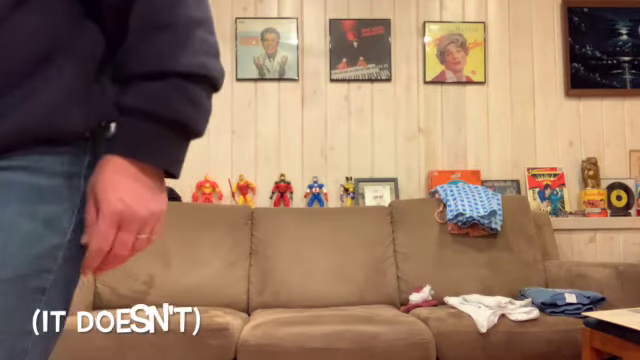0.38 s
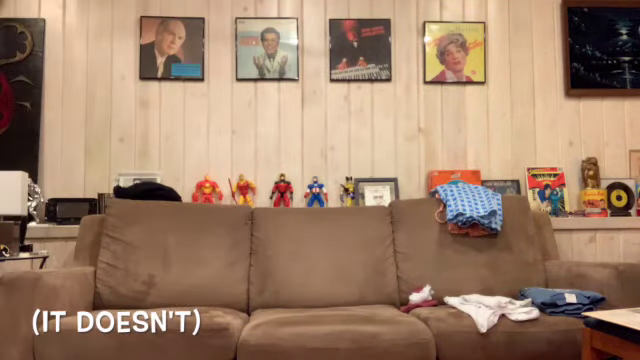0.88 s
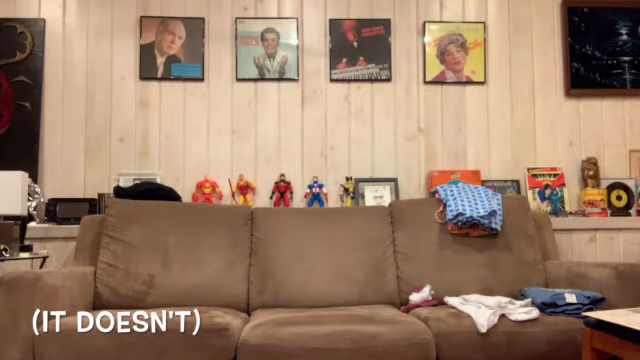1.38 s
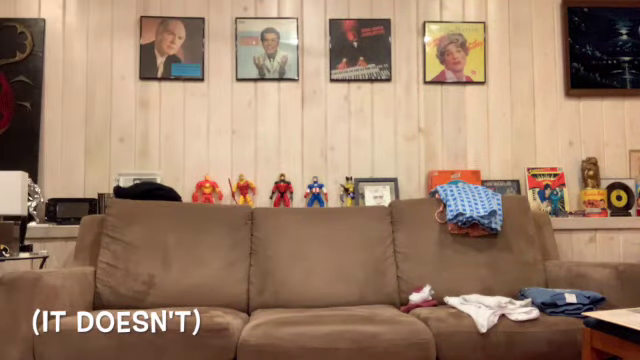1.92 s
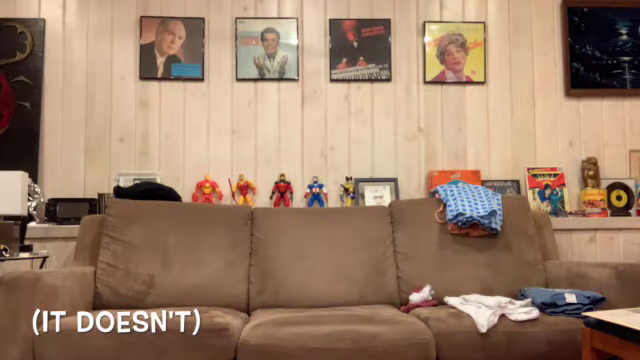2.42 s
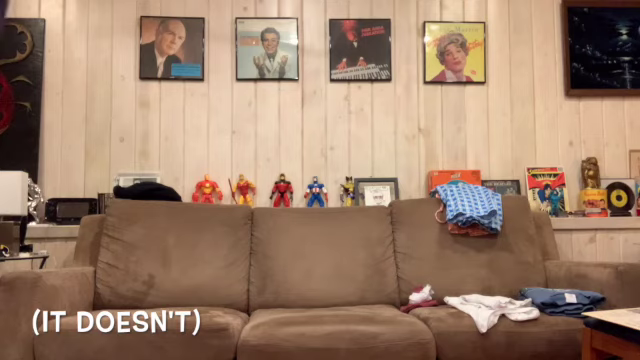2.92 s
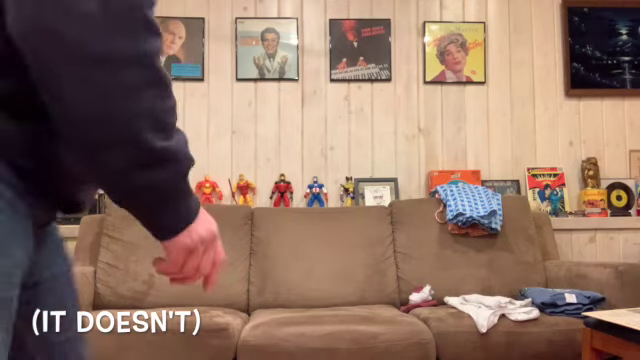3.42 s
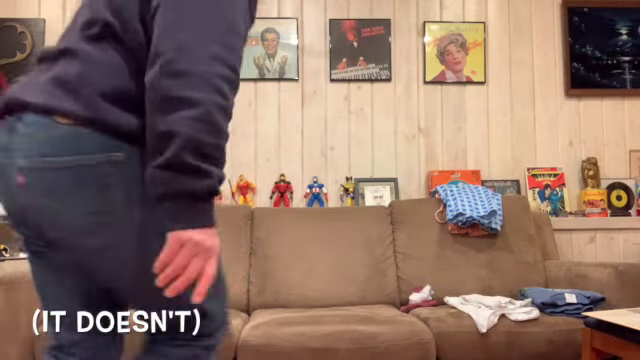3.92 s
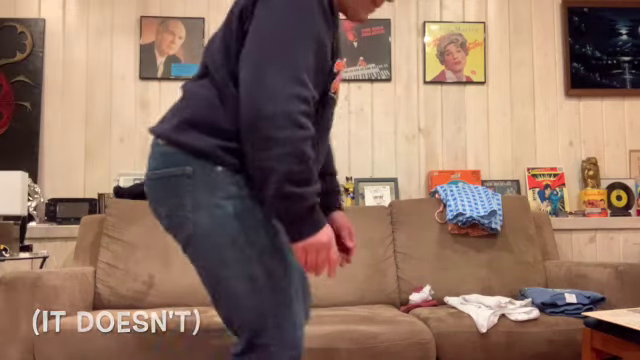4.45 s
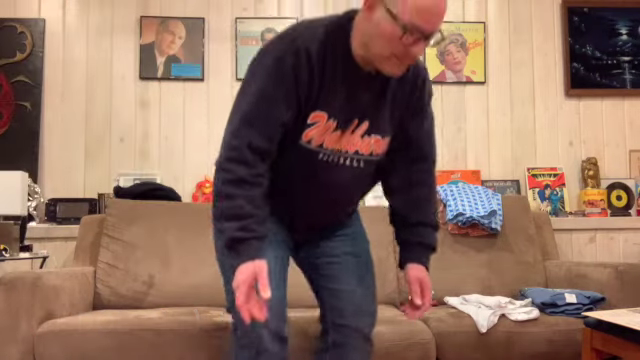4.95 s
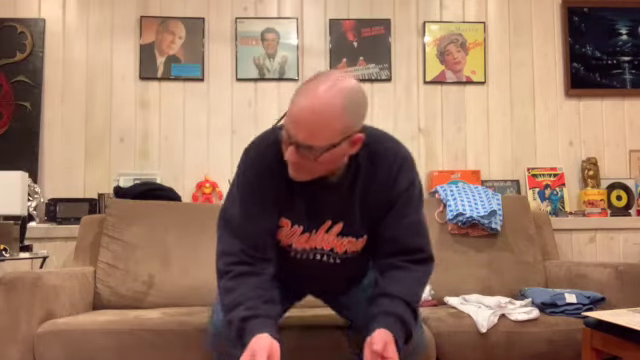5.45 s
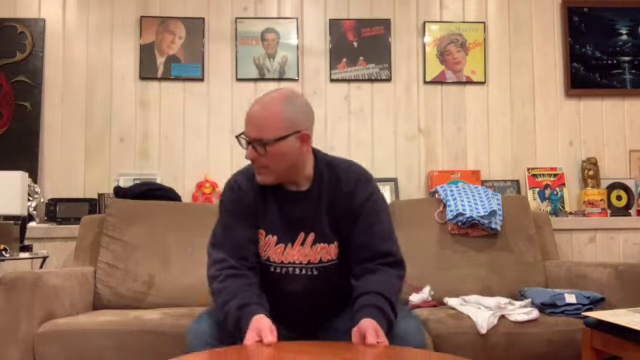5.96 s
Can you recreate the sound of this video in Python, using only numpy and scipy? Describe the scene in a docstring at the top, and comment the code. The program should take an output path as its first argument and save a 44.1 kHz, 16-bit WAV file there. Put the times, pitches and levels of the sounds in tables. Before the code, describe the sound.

A small panelled room with a short reverberation, heard by a stereo phone over soft hiss and very faint mains hum. At 0.1 s a close cloth swish passes with a light scrape and scuff; low dull footfalls and more rustling follow around 0.7-0.8 s, then it quiets. At 1.6 s a distant cabinet latch shuts with a hard, rattly, bright clack, clearly the loudest event, followed by a weaker rebound at 1.75 s and a lingering low boom. Faint thuds follow near 2 s. From 2.6 s footsteps return on the hollow floor with swishes and scuffs, strong at 3.4 s and strongest around 3.95-4.1 s, with tiny clicks at 3.8 s. Softer thuds and rustles occur near 4.9-5 s, with small ticks at 5.25-5.3 s. From about 5.6 s until the end at 6 s, a low table drags over carpet, juddering, groaning and hissing as it grows louder.

```python
"""In a small panelled room a person walks out, shuts a cabinet latch with a clack and a rebound, and walks back.
Soles thud on a hollow floor (ringing modes), clothes swish (grainy noise) and small things tick (short clicks).
At the end a low table is pulled across the carpet: stick-slip noise through the modes of its top and legs.
A phone with two microphone ports hears it over room hiss (shaped noise) and a faint mains hum (a sine)."""
import sys
import numpy as np
from scipy import signal
from scipy.fft import rfft, irfft, next_fast_len
from scipy.io import wavfile
from scipy.ndimage import uniform_filter1d

SR = 44100
rng = np.random.default_rng(int(sys.argv[2]) if len(sys.argv) > 2 else 0)


def linear_from_db(decibels):
    """Turn decibels (scalar or array-like) into linear amplitude factors; 0 gives 1."""
    return 10 ** (np.asarray(decibels, float) / 20)


def generate_wav(sig):
    """Save sig (samples, or channels by samples) to the path in sys.argv[1] as 16-bit PCM at SR."""
    pcm = np.round(np.clip(np.atleast_2d(sig).T, -1, 1) * 32767).astype(np.int16)
    wavfile.write(sys.argv[1], SR, pcm)


N = 268392  # length in samples


def read(points, hz):
    """Log-frequency interpolation: reads a table on a logarithmic frequency axis."""
    f, value = np.transpose(points)
    return np.interp(np.log(hz + 1), np.log(f + 1), value)


# shared treble roll-off: pitch_hz [Hz], level_db [dB]
TREBLE_ROLL_OFF = [(6000, -0.5), (10000, -2.5), (12500, -10), (14300, -10.5), (14950, -52)]


def spectrum_gain(points, hz):
    """Spectral envelope: a source's own spectrum up to 6 kHz, held above it while the shared roll-off acts."""
    return linear_from_db(read(points, np.minimum(hz, 6000)) + read(TREBLE_ROLL_OFF, hz))


def evened(x):
    """Normalisation: scales to rms 1."""
    return x / np.sqrt(np.mean(x ** 2) + 1e-20)


def smooth_noise(size, count=N):
    """Low-pass noise: a running mean over size samples gives a slow random drift of rms 1."""
    return evened(uniform_filter1d(rng.standard_normal(count), size=size))


def add(mix, start_s, sound):
    """Superposition: adds a sound into the mix from its start time."""
    part = mix[..., round(start_s * SR):][..., :sound.shape[-1]]
    part += sound[..., :part.shape[-1]]


def coloured(x, gain):
    """Linear filtering: multiplies the spectrum by a gain function of frequency."""
    size = next_fast_len(x.shape[-1])
    spectrum = rfft(x, size) * gain(np.fft.rfftfreq(size, 1 / SR))
    return irfft(spectrum, size)[..., :x.shape[-1]]


def modes(x, table):
    """Modal synthesis: a sum of damped resonators with alternating signs, each scaled at its own peak."""
    out = 0
    for k, (hz, width_hz, db) in enumerate(table):
        pole = np.exp((-np.pi * width_hz + 2j * np.pi * hz) / SR)
        ringing = 2 * signal.lfilter([1 - abs(pole)], [1, -pole], x).real
        out = out + (-1) ** k * linear_from_db(db) * ringing
    return out


def lean(db):
    """Level panning: left and right gains that differ by db."""
    return linear_from_db(np.multiply.outer([.5, -.5], db))


def slowly(control):
    """Control-rate envelope: worked out every 64 samples and joined by straight lines."""
    t = np.arange(0, N + 64, 64) / SR
    return np.interp(np.arange(N) / SR, t, control(t))


def field(magnitude, size, patchy_db):
    """Random-phase synthesis: two noise fields from random short-time spectra with drifting patches."""
    hop = size // 4
    t, hz = np.arange(N // hop + 5) * hop / SR, np.fft.rfftfreq(size, 1 / SR)
    a, b, c, d, patches = rng.standard_normal((len(t), len(hz), 5)).T
    patches = uniform_filter1d(patches, size // 64, 0)  # smooth along frequency
    patches = evened(uniform_filter1d(patches, 4096 // size, 1))  # smooth along time
    spectra = np.array([a + 1j * b, c + 1j * d]) * magnitude(hz[:, None], t) * linear_from_db(patchy_db * patches)
    return signal.istft(spectra, nperseg=size, noverlap=size - hop)[1][:, :N]


# left-right likeness of diffuse sound: pitch_hz [Hz], likeness [-1 to 1]
PORT_LIKENESS = [(60, 0.37), (150, 0.67), (300, 0.63), (700, 0.14), (2000, 0.085), (6000, -0.056),
                 (7600, -0.98), (8600, 0.14), (10200, -0.23), (11200, 0.99)]


def ports(fields):
    """Interaural-style coherence: two unrelated fields become what the ports share and what sets them apart."""
    def share_gains(hz):
        likeness = np.clip(read(PORT_LIKENESS, hz), -1, 1)
        return np.sqrt([(1 + likeness) / 2, (1 - likeness) / 2])

    def early(hz):  # lows and mids reach the left port 0.23 ms first
        return np.exp(2j * np.pi * hz * .00023 / (1 + (hz / 4500) ** 6))

    shared, apart = coloured(fields, share_gains)
    return np.array([coloured(shared + apart, early), shared - apart])


# reverberation of the room: pitch_hz [Hz], t60_s [s]
ROOM_DECAY = [(100, 0.071), (260, 0.43), (700, 0.27), (4850, 0.24)]


def room(x, start_s=.004, count=1):
    """Frequency-dependent reverberation: sparse taps of random sign, each band dying at its own speed.
    A sound spread over count places gets a pair of tails for each."""
    taps = np.zeros((count, 2, SR // 2))
    at = np.arange(round(start_s * SR), SR // 2 - 20, 20)
    at = at + rng.integers(0, 20, (count, 2, len(at)))
    np.put_along_axis(taps, at, rng.choice([-1., 1.], at.shape), 2)
    hz, t, spectra = signal.stft(taps, SR, nperseg=256)
    decay = linear_from_db(-60 * t / read(ROOM_DECAY, hz)[:, None])
    tails = signal.istft(spectra * decay, SR, nperseg=256)[1]
    tails = tails / np.linalg.norm(tails[0, 0])
    # the places take turns, 256 samples each
    place = np.arange(N) // 256 % count == np.arange(count)[:, None]
    answers = signal.fftconvolve((x * place)[:, None], tails, axes=2)
    return ports(answers.sum(0)[:, :N])


# spectrum of the hiss before it is evened: pitch_hz [Hz], level_db [dB per Hz, relative]
HISS_SPECTRUM = [(25, -8.5), (55, 11.5), (86, -9), (120, 1), (170, -15), (306, -4.5), (600, -29.5),
                 (1100, -21), (2000, -22), (6000, -23)]
# mains hum before its waver: pitch_hz [Hz], level_db [dB rms]
MAINS_HUM = [(60, -70)]


def hiss():
    """Stationary noise and a tone: room air and microphone hiss, with a wavering mains hum."""
    t = np.arange(N) / SR
    noise = field(lambda hz, t: spectrum_gain(HISS_SPECTRUM, hz), size=2048, patchy_db=2.0)
    air = linear_from_db(-62) * evened(ports(noise))
    waver = evened(uniform_filter1d(rng.standard_normal((N, len(MAINS_HUM))), size=3000, axis=0))
    hum = 0
    for k, (hz, db) in enumerate(MAINS_HUM):
        tone = np.sqrt(2) * np.sin(2 * np.pi * (hz * t + rng.random()))
        hum = hum + linear_from_db(db + 1.4 * waver[:, k]) * tone
    return air + hum


def strokes(rows, fade_db_per_s, t):
    """Exponential envelope: the power of each stroke climbs 20 dB in its rise time, holds, then fades."""
    full_s, db, rise_s, hold_s = np.transpose(rows)[:4, :, None]
    below_db = 20 * np.maximum(full_s - t, 0) / rise_s
    faded_db = fade_db_per_s * np.maximum(t - full_s - hold_s, 0)
    return linear_from_db(db - below_db - faded_db) ** 2


# steady rustle of the moving body, and from 5.82 s the rubbing of the pulled table: start_s [s], level_db [dB],
# brightness [dB per octave]
BODY_RUSTLE = [(0.0, -58.5, -1), (0.5, -55.5, 0.5), (0.62, -56, 0.5), (0.79, -49.5, 0), (1.14, -61, 0),
               (1.25, -74.5, -7.5), (1.979, -63.5, -1), (2.3, -67, -2.5), (2.6, -63, -1), (2.83, -61.5, 2),
               (3.2, -65.5, 0.5), (4.42, -64.5, -2), (4.7, -62, 0), (5.2, -58.5, 0), (5.48, -59, -1),
               (5.82, -52, -2), (6.06, -49.5, -1)]
# swishes of cloth: full_s [s], level_db [dB], rise_s [s], hold_s [s], brightness [dB per octave]
CLOTH_SWISHES = [(0.065, -42.5, 0.048, 0.051, 0.5), (2.63, -50, 0.021, 0.0038, -3.5),
                 (2.852, -49, 0.05, 0.013, -1), (3.013, -45.5, 0.15, 0.012, -2.5),
                 (3.368, -55.5, 0.12, 0.15, 0), (3.548, -50, 0.14, 0.0035, -2),
                 (3.751, -53, 0.058, 0.023, 0.5), (3.942, -42, 0.24, 0.023, -1.5),
                 (4.107, -50.5, 0.12, 0.042, -0.3), (4.188, -54, 0.079, 0.12, -1.5),
                 (4.859, -47, 0.16, .004, -1.5), (5.015, -53.5, 0.024, 0.02, -1.5),
                 (5.261, -58, 0.27, 0.072, -0.5), (5.545, -54.5, 0.086, 0.018, -1)]


def rubbing(t):
    """Power addition: level and brightness of the cloth, where the loudest part sets the colour."""
    s, db, bright = np.transpose(BODY_RUSTLE)
    steady = linear_from_db(np.interp(t, s, db)) ** 2
    swishes = strokes(CLOTH_SWISHES, 184, t)  # fade in dB per s
    total = steady + swishes.sum(0)
    weighted_tilt = steady * np.interp(t, s, bright) + np.transpose(CLOTH_SWISHES)[4] @ swishes
    return np.sqrt(total), weighted_tilt / total


# spectrum of rubbing fibres before tilt and soft top: pitch_hz [Hz], level_db [dB per Hz, relative]
CLOTH_SPECTRUM = [(250, -11), (500, -6.5), (1300, -2.5), (2500, -6), (4300, -6.5), (6000, -10.5)]


def cloth():
    """Friction noise: rubbing fibres, grainy, with a tilt about 2 kHz that turns as the rubbing part changes."""
    def magnitude(hz, t):
        tilt = linear_from_db(rubbing(t)[1] * np.log2(np.clip(hz, 400, 12000) / 2000))
        soft_top = 1 / np.sqrt(1 + (hz / 7500) ** 4)
        return spectrum_gain(CLOTH_SPECTRUM, hz) * soft_top * tilt

    swish = field(magnitude, size=256, patchy_db=2.0)
    swish /= np.sqrt(uniform_filter1d((swish ** 2).mean(0), size=4000))  # tilt changes colour, not level
    grain = linear_from_db(1.44 * smooth_noise(250))  # threads catch in short bunches
    return ports(swish * grain * slowly(lambda t: rubbing(t)[0])) * lean(3.0)[:, None]


# scuffs of soles: full_s [s], level_db [dB], rise_s [s], hold_s [s]
SOLE_SCUFFS = [(0.15, -51.5, 0.042, .004), (0.79, -50.5, 0.26, 0.033), (3.01, -48.5, 0.25, 0.0028),
               (3.41, -38, 0.056, 0.0027), (3.94, -44.5, 0.19, 0.0023), (5.82, -56, 0.2, .3)]


def shuffling(t):
    """Power addition: soles shuffle 8.5 dB under the steady rustle, and single scuffs rise above it."""
    s, db, _ = np.transpose(BODY_RUSTLE)
    steady = linear_from_db(np.interp(t, s, db) - 8.5) ** 2
    return np.sqrt(steady + strokes(SOLE_SCUFFS, 230, t).sum(0))  # fade in dB per s


# modes of the hollow floor: pitch_hz [Hz], level_db [dB, relative], t60_s [s, free ringing after a footfall]
FLOOR_MODES = [(42.4, 3, 0.47), (60, 23, 0.1), (157.2, 7.5, 0.071), (176.5, 9, 0.09), (235, 5, 0.091),
               (288.3, 7, 0.12), (308, 6.5, 0.058), (446, 4, 0.12), (582, -3.5, 0.04)]


def scuff():
    """Forced vibration: rolling and dragging soles shake the floor modes with lumpy noise."""
    lumps = linear_from_db(2.5 * smooth_noise(900))
    # the two deepest modes stay out; the others are wider than in free ringing (2.2 / t60)
    boards = [(hz, 3.04 / t60, db) for hz, db, t60 in FLOOR_MODES[2:]]
    shake = evened(modes(rng.standard_normal((2, N)) * lumps, boards))
    return ports(shake * slowly(shuffling))


# scrapes of a seam, sole or latch tongue:
# start_s [s], length_s [s], pitch_hz [Hz], width_hz [Hz, each of two passes], level_db [dB before the stroke shape]
PITCHED_SCRAPES = [(0.038, 0.092, 1340, 504, -42.5), (1.529, 0.015, 4200, 900, -54),
                   (1.56, 0.13, 1290, 2460, -44.5), (1.752, 0.038, 4270, 1300, -36),
                   (3.035, 0.031, 2330, 600, -45.5), (3.773, 0.039, 4340, 2920, -43.5),
                   (3.772, 0.031, 1000, 300, -42), (4.252, 0.11, 1310, 400, -51)]


def scrapes():
    """Resonant filtering: noise passes twice through one broad resonance, starting fast and fading."""
    out = np.zeros((2, N))
    t = np.arange(4096) / SR
    for s, length, hz, width, db in PITCHED_SCRAPES:
        stroke = (t / length) ** 0.2 * np.exp(-(1.5 * t / length) ** 2)
        band = [(hz, width, 0)]
        noise = evened(modes(modes(rng.standard_normal((2, 4096)), band), band))
        add(out, s, linear_from_db(db) * stroke * noise)
    return ports(out)


# small clicks: start_s [s], level_db [dB peak before the room], pitch_hz [Hz], gap_s [s between bounces]
SMALL_TICKS = [(2.097, -54, 780, .004), (3.774, -41, 1000, .0045), (3.7752, -38, 4200, .002),
               (5.2465, -34.5, 3300, .0027), (5.2965, -43, 1150, .005)]


def ticks():
    """Impulse response: seams, buttons and joints snap, bounce between near hard faces, and the room answers."""
    near, t = np.zeros(N), np.arange(800) / SR
    for s, db, hz, gap in SMALL_TICKS:
        snap = sum(linear_from_db(-4 * k) * (abs(t - gap * k) < .5 / SR) for k in range(3))
        click = modes(snap, [(hz, 0.65 * hz, 0), (0.96 * hz, 0.83 * hz, -1.5)])
        click = modes(click, [(1.3 * hz, 0.95 * hz, 0)])
        add(near, s, linear_from_db(db) * click / abs(click).max())
    return near + linear_from_db(4.0) * room(near, start_s=0.00238)


# low thuds, mostly footfalls; the last row, at 5.983 s, is a bump as the pulled table's pitch sinks to 170 Hz:
# start_s [s], level_db [dB peak before the room], pitch_hz [Hz, centre of the thud]
LOW_THUDS = [(0.726, -37.5, 188), (0.761, -34.5, 60), (0.82, -39.5, 55.6), (1.815, -44, 342),
             (2.06, -53, 69.5), (2.605, -41, 148), (2.844, -41, 240), (2.998, -39, 355),
             (3.329, -42.5, 267), (3.395, -35, 330), (3.4037, -29, 205), (3.424, -36.5, 245),
             (3.426, -38.5, 44.4), (3.546, -41, 340), (3.876, -36.5, 327), (3.953, -25, 214),
             (4.094, -29.5, 250), (4.869, -44, 346), (5, -43, 158), (5.983, -41, 170)]


def steps():
    """Modal excitation: a push of about two cycles rings the floor modes near it; deep thuds start more slowly."""
    out, t = np.zeros(N), np.arange(SR // 3) / SR
    for s, db, centre_hz in LOW_THUDS:
        ring = 0
        for hz, level, t60 in FLOOR_MODES:
            off_centre_db = 10.3 * np.log2(hz / centre_hz) ** 2
            ring = ring + linear_from_db(level - off_centre_db - 60 * t / t60) * np.sin(2 * np.pi * hz * t)
        ring *= np.sin(np.pi / 2 * np.minimum(t * centre_hz / 1.3, 1)) ** 2
        push = np.exp(-((t * centre_hz - 1.1) / 0.71) ** 2) * np.sin(2 * np.pi * centre_hz * t)
        thud = ring / abs(ring).max() + 1.2 * push
        add(out, s, linear_from_db(db) * thud / abs(thud).max())
    return out + linear_from_db(-6.0) * room(out, start_s=0.00722)


# slips locked to a mode: pitch_hz [Hz], wander_hz [Hz rms], level_db [dB rms before the swell], start_s [s], end_s [s]
LOCKED_SLIPS = [(231, 10.4, -55.5, 5.76, 6.0), (1090, 12, -54.5, 5.655, 5.705),
                (1100, 10.6, -53, 5.8, 5.855)]


def judder():
    """Mode locking: for a while the slipping falls in step with one mode and sings almost steadily."""
    t, out = np.arange(N) / SR, 0
    for hz, wander_hz, db, start, end in LOCKED_SLIPS:
        drift, swell = smooth_noise(700), smooth_noise(700)
        hold = np.clip((t - start) / 0.022, 0, 1) * np.clip((end - t) / 0.025, 0, 1)
        tone = np.sqrt(2) * np.sin(2 * np.pi * np.cumsum(hz + wander_hz * drift) / SR)
        out = out + linear_from_db(db + 3.0 * swell) * hold * tone
    return out


# course of the pull: start_s [s], top_level_db [dB], legs_level_db [dB, legs before the pile is added]
TABLE_PULL = [(5.57, -64, -87), (5.67, -63, -59), (5.802, -53.5, -53), (6.08, -51, -49.5)]
# modes of the table top: pitch_hz [Hz], width_hz [Hz, each of two passes], level_db [dB, relative]
TABLE_TOP = [(227.2, 22, 0), (566, 34, -8.5)]
# modes of the table legs: pitch_hz [Hz], width_hz [Hz, each of two passes], level_db [dB, relative]
TABLE_LEGS = [(1092, 145, 9), (1880, 320, 2.5)]


def table():
    """Stick-slip friction: legs slip on the carpet and drive sharp modes of top and legs, and the pile hisses."""
    s, top_db, legs_db = np.transpose(TABLE_PULL)
    t = np.arange(N) / SR
    slips = rng.standard_normal((2, N)) * linear_from_db(smooth_noise(500))

    def body(rows):  # each mode filters the slips twice
        return evened(sum(modes(modes(slips, [(hz, width, db)]), [(hz, width, 0)]) for hz, width, db in rows))

    def pile_gain(hz):
        return linear_from_db(read(TREBLE_ROLL_OFF, hz) - 13 * np.log2((hz + 1) / 9000) ** 2)

    pile = linear_from_db(-3.0) * evened(coloured(slips, pile_gain))
    top = linear_from_db(np.interp(t, s, top_db)) * body(TABLE_TOP)
    legs = linear_from_db(np.interp(t, s, legs_db)) * (body(TABLE_LEGS) + pile)
    fade = np.clip((t - s[0]) / 0.028, 0, 1)
    return ports(fade * (top + legs))


# shutting and rebound:
# start_s [s], level_db [dB before the crack's colour], rise_s [s], length_s [s], brightness [dB per octave]
LATCH_CLACKS = [(1.5984, -20, 0.0091, 0.03, -1), (1.747, -30, 0.012, 0.037, -1.23)]
# modes of door and catch: pitch_hz [Hz], width_hz [Hz], level_db [dB, at the first clack, before decay and room]
LATCH_MODES = [(153, 15, -31.5), (312.2, 13.3, -33.5), (632, 54, -22.5), (1020, 38, -26), (6420, 33, -31.5)]
# colour of the crack: pitch_hz [Hz], level_db [dB per Hz, relative]
CRACK_SPECTRUM = [(100, -28), (500, -8.5), (800, -7.5), (1200, 2.5), (1700, -4), (2300, 1.5), (3000, -4.5),
                  (3900, -2), (6000, -14)]
# air in the cabinet, which hums on: pitch_hz [Hz], level_db [dB before decay], t60_s [s]
CABINET_AIR = (115, -49, 1.8)


def latch():
    """Impact excitation: a quick rattle of hard contacts and one blow that rings door and latch.
    It is far off, so much room is heard."""
    rattles, rings, t = np.zeros(N), np.zeros(N), np.arange(8192) / SR
    first_s, first_db = LATCH_CLACKS[0][:2]
    for s, db, rise_s, length, tilt_db in LATCH_CLACKS:
        contacts = rng.standard_normal(8192) * linear_from_db(4.5 * rng.standard_normal(8192 // 32).repeat(32))
        rattle = contacts * np.clip(t / rise_s, 0, 1) ** 1.5 * np.clip((length - t) / 0.016, 0, 1)
        own = np.sqrt(uniform_filter1d(abs(rfft(rattle)) ** 2, size=40))  # many contacts favour no band
        rattle = coloured(rattle, lambda hz: linear_from_db(tilt_db * np.log2((hz + 100) / 1000)) / own)
        add(rattles, s, linear_from_db(db) * rattle / np.std(rattle[:2048]))
        ring = 0
        for hz, width, level in LATCH_MODES:
            envelope = np.minimum(t * hz / 3.0, 1) * np.exp(-np.pi * width * t)  # builds up over three cycles
            ring = ring + linear_from_db(level) * envelope * np.sin(2 * np.pi * hz * t)
        add(rings, s + rise_s, linear_from_db(db - first_db) * ring)
    crack = coloured(rattles, lambda hz: spectrum_gain(CRACK_SPECTRUM, hz))
    crack = (linear_from_db(1.5) * crack + linear_from_db(6.0) * room(crack, start_s=.002, count=5)) * lean(-0.99)[:, None]

    hz, db, t60 = CABINET_AIR
    t = np.arange(SR) / SR
    boom = np.zeros(N)
    add(boom, first_s, np.minimum(t / 0.054, 1) * linear_from_db(db - 60 * t / t60) * np.sin(2 * np.pi * hz * t))
    return crack + rings + linear_from_db(2.5) * room(rings) + boom


def scene():
    """Superposition: all sources add at the two ports."""
    background = hiss() + cloth() + scuff() + scrapes() + ticks()
    return background + steps() + judder() + table() + latch()


def top_cut(x):
    """Nothing passes above the cut-off."""
    return signal.sosfilt(signal.butter(12, 15030, fs=SR, output="sos"), x)


def record(dry):
    """Phase cancellation and high-pass filtering: the ports cancel near 9 kHz and lose the deep bass."""
    def cancel(hz):  # near 9 kHz the ports hear opposite phase
        return linear_from_db(-14 * np.exp(-((hz - 8850) / 950) ** 4))

    def bass_cut(hz):
        return 1 / np.sqrt(1 + (42 / (hz + 1)) ** 6)

    shared, apart = coloured(dry.mean(0), cancel), (dry[0] - dry[1]) / 2
    mix = coloured(np.array([shared + apart, shared - apart]), bass_cut)
    return top_cut(mix)


dry = scene()
out = record(dry)
generate_wav(out)
```